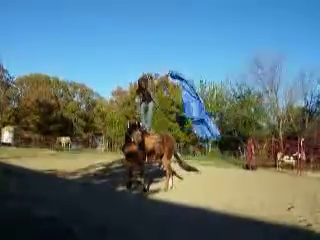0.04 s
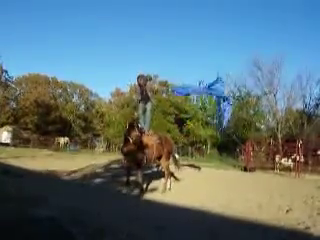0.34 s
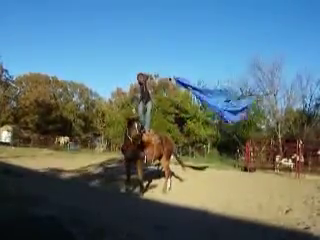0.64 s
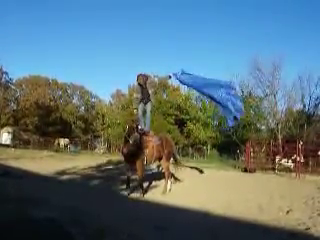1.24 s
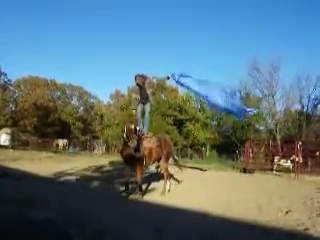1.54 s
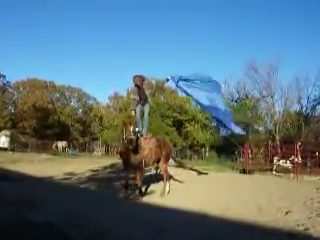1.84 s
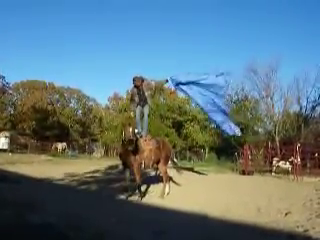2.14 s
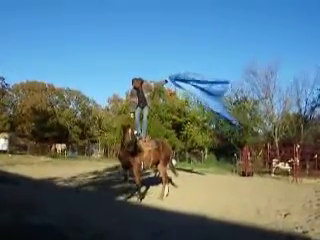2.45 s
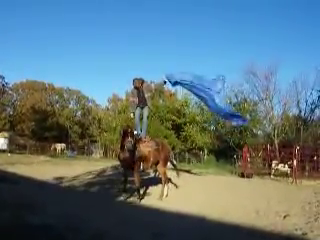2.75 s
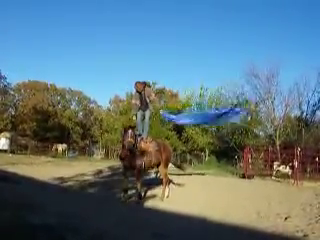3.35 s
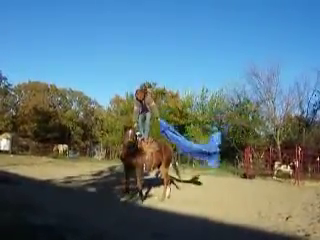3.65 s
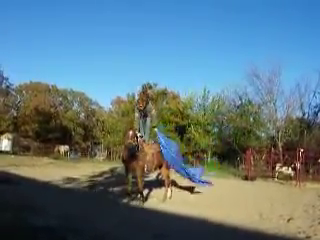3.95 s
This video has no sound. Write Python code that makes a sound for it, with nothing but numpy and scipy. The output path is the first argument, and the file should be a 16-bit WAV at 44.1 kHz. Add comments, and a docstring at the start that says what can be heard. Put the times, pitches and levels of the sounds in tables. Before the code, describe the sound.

Wind buffets the microphone throughout with a deep, uneven rumble and rough flutter. The gusts sharpen around 1 second, again from 1.6 to 2.3 seconds, and hit hardest from 3.4 seconds to the end, slightly overloading the microphone. Distant leaves hiss softly underneath. A tarp some way off gives a brief swish at about 0.4 seconds, then fainter ones near 1.5, 1.8 and 2.6 seconds.

```python
"""An open paddock in gusty wind, heard from a small camera's microphone standing in the flow.
Right at the microphone, large eddies make a deep rumble and small ones a rough flutter that grows
brighter as a gust hits harder. Leaves hiss all around, and a tarp swishes some way off.
The strongest gusts overload the microphone."""
import sys
import numpy as np
from scipy import signal
from scipy.fft import rfft, irfft, next_fast_len
from scipy.io import wavfile
from scipy.ndimage import uniform_filter1d, map_coordinates

SR = 44100
rng = np.random.default_rng(int(sys.argv[2]) if len(sys.argv) > 2 else 0)


def generate_wav(signal):
    """Clip the signal to [-1, 1] and save it as 16-bit WAV at the path in sys.argv[1]."""
    frames = np.transpose(np.atleast_2d(signal))
    scaled = np.clip(frames, -1, 1) * 32767
    pcm = np.round(scaled).astype(np.int16)
    wavfile.write(sys.argv[1], SR, pcm)


N = 176400  # 4 s


def amp(db):
    """Decibels to gain."""
    return 10 ** (np.asarray(db) / 20)


def unit(x):
    """Scale to rms 1."""
    return x / np.sqrt(np.mean(x ** 2) + 1e-20)


def curve(rows):
    """Join (time_s, value) points with lines, one value per sample."""
    return np.interp(np.arange(N) / SR, *np.transpose(rows))


def wobble(per_s):
    """A smooth curve through per_s random values a second."""
    return map_coordinates(rng.standard_normal(2000), [np.arange(N) * per_s / SR], mode="wrap")


def filtered(x, response):
    """Filter x by response(hz), a gain at each frequency."""
    size = next_fast_len(N + SR // 2)
    return irfft(rfft(x, size) * response(np.fft.rfftfreq(size, 1 / SR)), size)[..., :N]


def noise(spectrum):
    """Noise of rms 1, shaped by (frequency_hz, level_db) points."""
    points_hz, level_db = np.transpose(spectrum)
    white = rng.standard_normal(N)
    return unit(filtered(white, lambda hz: amp(np.interp(np.log(hz + 1), np.log(points_hz + 1), level_db))))


def steady(x, samples):
    """Smooth away the chance swells of a noise, so that the wind alone sets its level."""
    power = np.abs(signal.hilbert(x)) ** 2
    smoothed = uniform_filter1d(uniform_filter1d(power, samples), samples)
    return unit(x / np.sqrt(np.abs(smoothed) + 1e-9))


# Pressure of the slow, large eddies, right on the microphone: time_s, level_db
RUMBLE_LEVELS = [(0.0, -30.5), (0.04, -13.0), (0.12, -26), (0.29, -19), (0.39, -26.5), (0.56, -35.5),
                 (0.63, -23.5), (0.69, -10.0), (0.77, -23.5), (0.9, -23), (1.02, -22), (1.21, -12.5),
                 (1.3, -19.0), (1.44, -14), (1.52, -20), (1.58, -12), (1.66, -23), (1.78, -14.5),
                 (1.85, -8.5), (1.98, -23), (2.08, -8.5), (2.24, -19.5), (2.48, -9.5), (2.56, -21),
                 (2.63, -12.5), (2.77, -16), (2.87, -12), (3.04, -15.5), (3.14, -19.5), (3.25, -14.0),
                 (3.4, -10), (3.45, -20.5), (3.5, -13.5), (3.6, -8.5), (3.64, -18), (3.69, -6), (3.75, -18),
                 (3.82, -4.5), (3.9, -13.5), (4.0, -35.5)]
# Their deep tone at the diaphragm: frequency_hz, level_db
RUMBLE_SPECTRUM = [(10, -13.5), (22, -3.5), (34, -0.5), (62, -1.5), (90, -6.5), (130, -15), (200, -24),
                   (400, -47), (900, -98)]

def wind_rumble(trim_db=0.6, lump_db=1.7):
    """Large eddies push the diaphragm slowly to and fro, so the rumble comes in lumps."""
    level_db = trim_db + curve(RUMBLE_LEVELS) + lump_db * wobble(per_s=33)
    return amp(level_db) * steady(noise(RUMBLE_SPECTRUM), samples=1500)


# Gusts striking the microphone: peak_s, half_length_s, level_db, corner_hz
MICROPHONE_GUSTS = [(0.074, 0.095, -30, 308), (0.153, 0.019, -20.5, 310), (0.299, .024, -18, 232),
                    (0.684, 0.033, -17, 317), (0.863, .037, -15, 219), (0.951, 0.029, -19, 350),
                    (1.031, 0.02, -16, 241), (1.072, 0.0051, -13, 1100), (1.088, 0.021, -12, 595),
                    (1.164, 0.012, -11, 574), (1.207, 0.017, -13.5, 755), (1.26, 0.13, -23.5, 196),
                    (1.415, 0.035, -25, 550), (1.616, 0.039, -14.5, 274), (1.649, 0.0043, -9, 1710),
                    (1.713, 0.079, -14, 773), (1.816, 0.018, -15, 1500), (2.028, 0.016, -20, 320),
                    (2.066, .015, -10, 1190), (2.194, .075, -20.5, 560), (2.226, .007, -15.5, 1390),
                    (2.262, .039, -15, 730), (2.415, 0.027, -14.5, 520), (2.49, .025, -20, 696),
                    (2.621, 0.029, -20.5, 350), (2.734, 0.0098, -21, 415), (2.853, 0.051, -26, 603),
                    (2.956, .018, -14, 790), (3.037, 0.018, -21, 440), (3.193, 0.0087, -19.5, 950),
                    (3.213, 0.017, -16.5, 196), (3.333, .019, -20.5, 490), (3.398, 0.0049, -8.5, 900),
                    (3.429, 0.0031, -16.5, 800), (3.484, .017, -14.5, 417), (3.538, 0.035, -16.5, 860),
                    (3.588, 0.0063, -12, 900), (3.66, .005, -15, 697), (3.681, .014, -9.5, 1280),
                    (3.737, 0.021, -16, 770), (3.792, 0.0048, -9.5, 1140), (3.881, 0.03, -16, 1390),
                    (3.942, .025, -11.5, 1520), (3.99, 0.027, -7.5, 1300)]

def gusts():
    """Gusts arrive faster than they fade; the strongest leads the treble. Gives gain and corner_hz."""
    peak_s, half_length_s, level_db, corner_hz = np.transpose(MICROPHONE_GUSTS)[:, :, None]
    t = np.arange(N) / SR
    coarse_t = t[::32]
    reach_s = half_length_s * np.where(coarse_t < peak_s, 0.81, 1.13)  # rise, fall
    power = amp(level_db) ** 2 * np.exp(-((coarse_t - peak_s) / reach_s) ** 2) + 1e-9
    total_power = power.sum(0)
    blended_hz = np.exp((power * np.log(corner_hz)).sum(0) / total_power)
    return np.interp(t, coarse_t, np.sqrt(total_power)), np.interp(t, coarse_t, blended_hz)


# Rough air at the microphone port, before its treble is rolled off: frequency_hz, level_db
FLUTTER_SPECTRUM = [(40, -20), (85, 2), (145, 2.5), (320, -4), (600, -12.5), (1200, -19.5), (2400, -24.5),
                    (5000, -36)]

def wind_flutter(trim_db=-0.26, eddy_db=3, eddy_octaves=0.25, lowpass_order=2.97):
    """Small eddies tear at the microphone port in each gust; a faster eddy is louder and brighter."""
    gust_gain, corner_hz = gusts()
    eddies = wobble(per_s=170)
    corner_octave = np.log2(corner_hz) + eddy_octaves * eddies
    air = steady(noise(FLUTTER_SPECTRUM), samples=500)
    flutter = np.zeros(N)
    for octave in range(6, 14):  # a moving low-pass: crossfade corners from 64 to 8192 Hz
        dulled = filtered(air, lambda hz: 1 / np.sqrt(1 + (hz / 2 ** octave) ** (2 * lowpass_order)))
        flutter += dulled * np.maximum(0, 1 - np.abs(corner_octave - octave))
    return amp(trim_db + eddy_db * eddies) * gust_gain * flutter


# Leaves in the distance, on all sides of the microphone: time_s, level_db
LEAF_LEVELS = [(0, -41.5), (.35, -40.5), (.7, -40), (.85, -41.5), (1.3, -42), (1.8, -41.5), (1.9, -45),
               (2.04, -43), (2.1, -47.5), (2.27, -44), (2.95, -46), (3.25, -42.5), (3.53, -43), (3.62, -48),
               (3.77, -45.8), (3.84, -50), (4, -50)]
# Their broad hiss from across the paddock: frequency_hz, level_db
LEAF_SPECTRUM = [(150, 6.5), (500, 5), (1000, 1.5), (2000, 2.5), (3100, 0.5), (4200, 1), (5600, -0.5),
                 (7300, 1), (8500, -2.5), (10000, -31.5)]

def leaf_hiss(trim_db=4.5, flicker_db=0.57):
    """Countless distant leaves merge into a smooth hiss that flickers slightly."""
    level_db = trim_db + curve(LEAF_LEVELS) + flicker_db * wobble(per_s=25)
    return amp(level_db) * noise(LEAF_SPECTRUM)


# A tarp whipping some way off: peak_s, half_length_s, level_db
TARP_SWISHES = [(0.445, 0.015, -32), (1.537, 0.025, -42.5), (1.835, .018, -36), (2.592, 0.013, -39.5),
                (2.723, 0.0087, -38.5)]
# Its thin, bright tone at that distance: frequency_hz, level_db
TARP_SPECTRUM = [(400, -14), (1200, -1), (2400, -0.5), (7000, 0.5), (9000, -11), (11000, -44)]

def tarp_swishes():
    """Each whip of the sheet is a short swell of bright noise."""
    t = np.arange(N) / SR
    swells = sum(amp(level_db) * np.exp(-2 * ((t - peak_s) / half_length_s) ** 2)
                 for peak_s, half_length_s, level_db in TARP_SWISHES)
    return swells * noise(TARP_SPECTRUM)


def scene():
    """Wind on the microphone, with the leaves and the tarp behind it, in mono."""
    return (wind_rumble() + wind_flutter() + leaf_hiss() + tarp_swishes())[None]


def record(dry, clip_level=0.71, hardness=10, top_hz=8050):
    """The camera's input flattens the biggest pressure swings and keeps nothing above its band limit."""
    clipped = dry / (1 + np.abs(dry / clip_level) ** hardness) ** (1 / hardness)
    return filtered(clipped, lambda hz: (hz < 9000) / np.sqrt(1 + (hz / top_hz) ** 56))


dry = scene()
out = record(dry)
generate_wav(out)
```